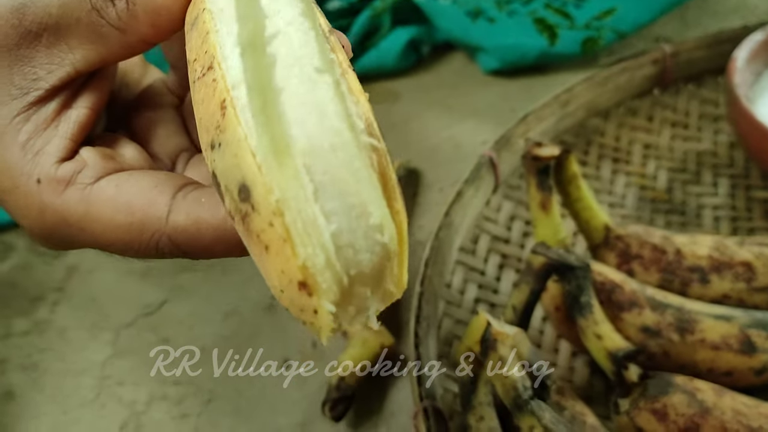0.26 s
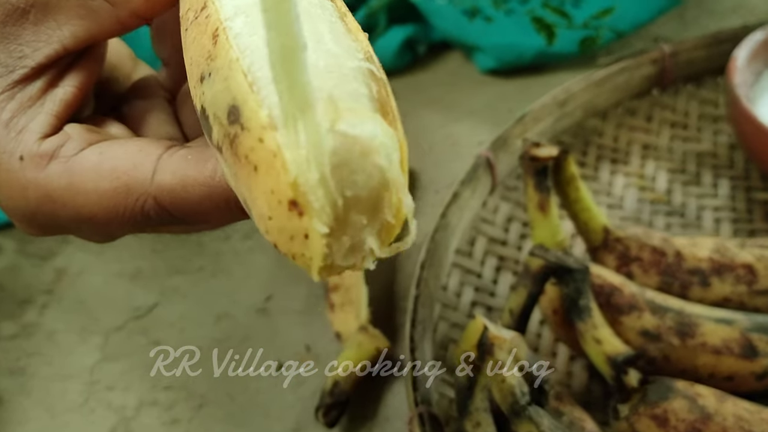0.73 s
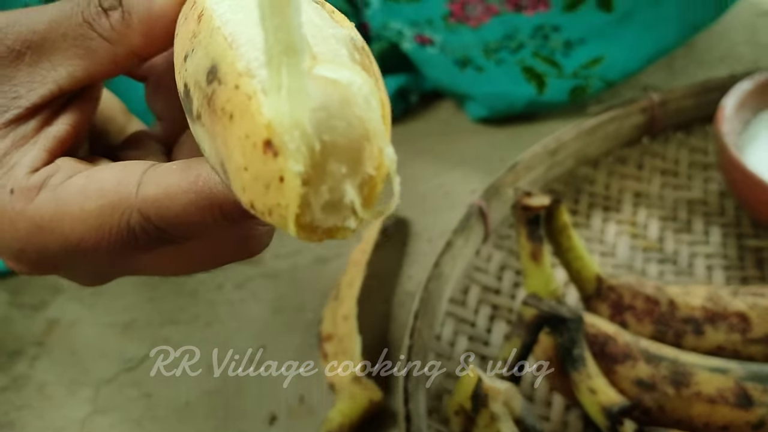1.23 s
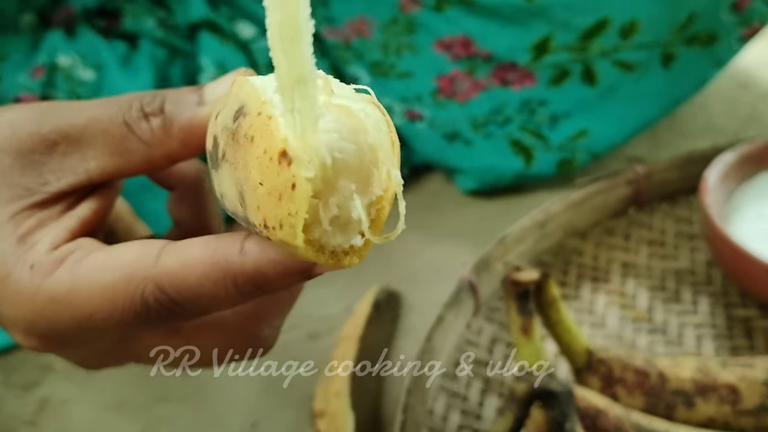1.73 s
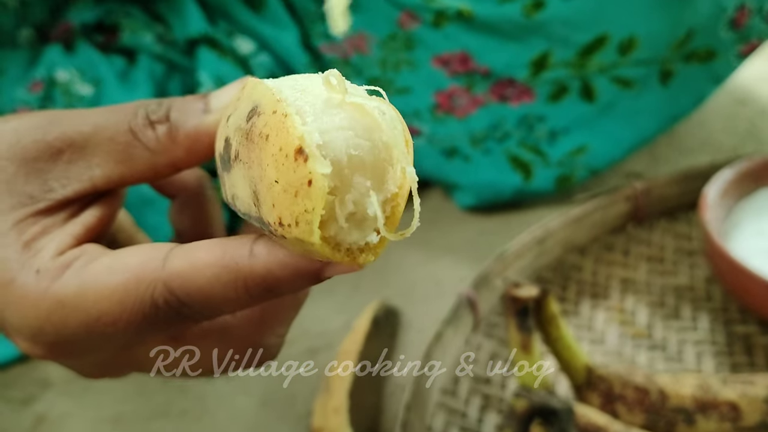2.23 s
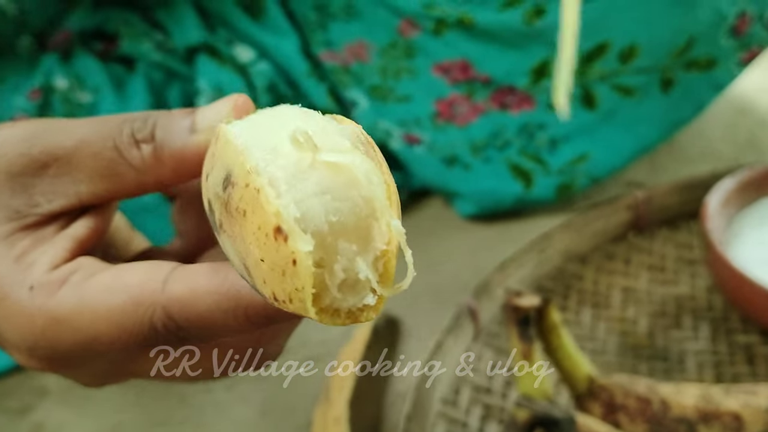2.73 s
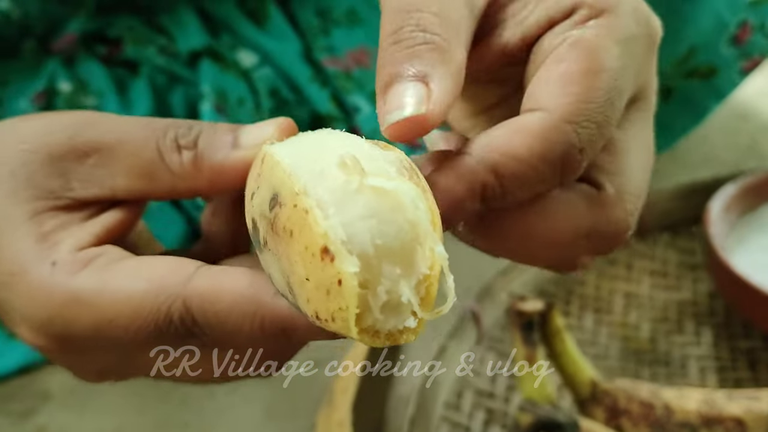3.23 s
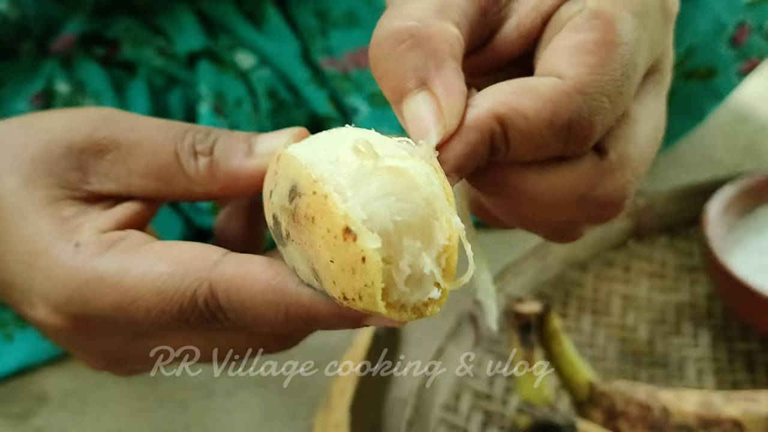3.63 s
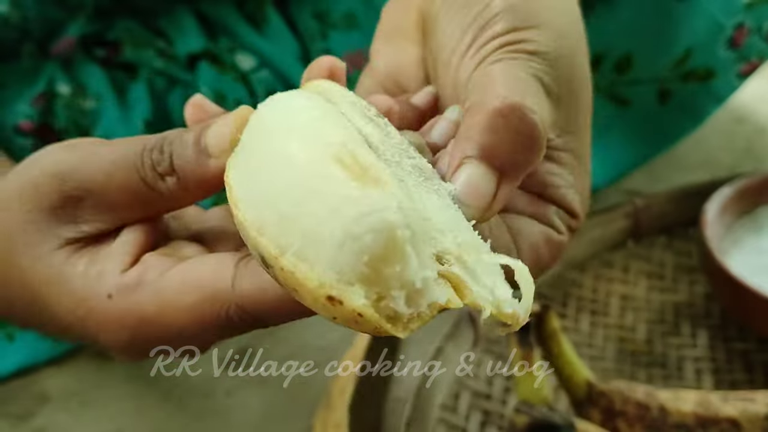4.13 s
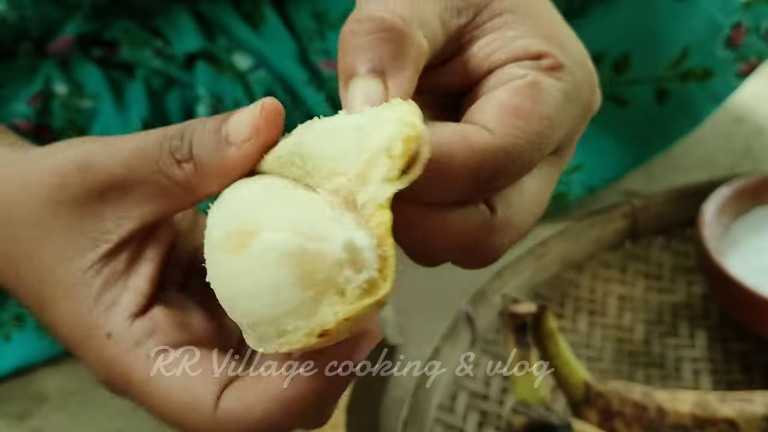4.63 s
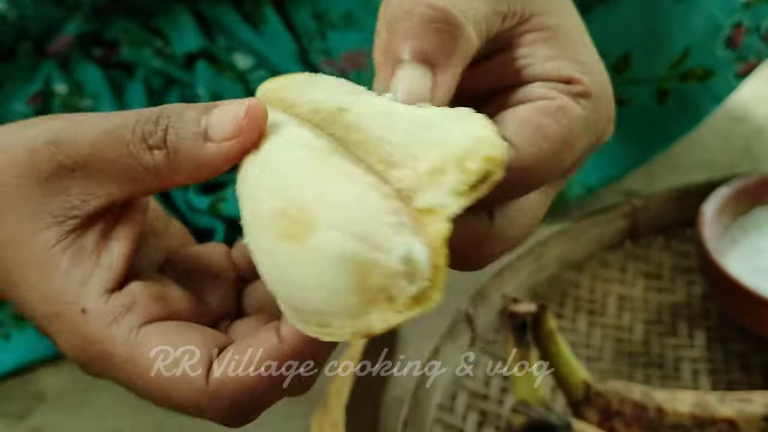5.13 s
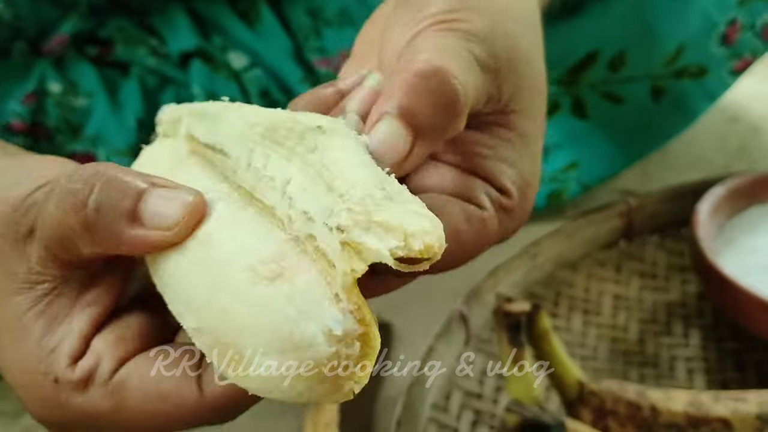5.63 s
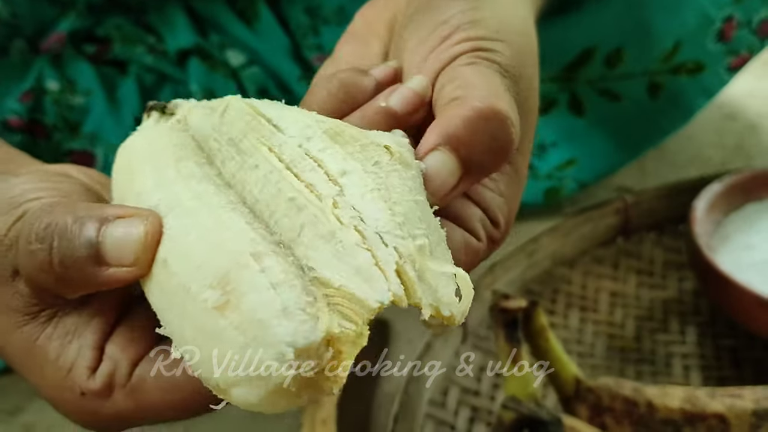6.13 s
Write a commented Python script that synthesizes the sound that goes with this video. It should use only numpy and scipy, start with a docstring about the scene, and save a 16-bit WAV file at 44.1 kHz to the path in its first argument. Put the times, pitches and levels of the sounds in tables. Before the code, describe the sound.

In a village yard, a distant engine thuds slowly under a wide, even hiss and low rumble. Small birds give short, falling chirps that echo off nearby walls. From halfway, the engine fades a little, farther birds add hoarse notes, including a two-note call given twice, and an insect buzzes faintly. Wind buffets both sides of the microphone, briefly ducking the background, and one soft rustle ends it.

```python
"""A village yard, where a far engine thuds under a wide, even hiss and a low rumble.
Small birds chirp, each a falling whistle thrown back by the walls; farther birds hold hoarse notes,
among them a two-note call given twice. In the second half moving air buffets the left and right
microphones, and the recorder turns the whole yard down at each strong puff.
A faint insect buzzes, and one soft rustle comes at the very end."""
import sys
import numpy as np
from scipy import signal
from scipy.fft import rfft, irfft
from scipy.io import wavfile
from scipy.ndimage import uniform_filter1d

SR = 44100
rng = np.random.default_rng(int(sys.argv[2]) if len(sys.argv) > 2 else 0)


def to_wav(sig):
    """Store sig (one row per channel, or 1-D mono) as 16-bit WAV at the path in sys.argv[1].

    Samples outside -1..1 are clipped; the rate is SR.
    """
    pcm = np.clip(np.atleast_2d(sig), -1, 1) * 32767
    pcm = np.round(pcm).astype(np.int16)
    wavfile.write(sys.argv[1], SR, pcm.T)  # frames by channels


N = 280902
TIME = np.arange(N) / SR


def air_puffs(rise=1.2, fall=3.32, steady_s=0.041, top_hz=410):
    """Swirls of air hit the microphones as soft, low bumps, mostly on one side."""
    # puffs of air: (peak time [s], length [s], louder side's level [dB], left minus right [dB], pitch [Hz])
    puffs = [(3.211, 0.12, -22.5, 6, 80), (3.311, .09, -21, -19, 55), (3.453, .09, -23.5, 4, 55),
             (3.84, 0.088, -18, 2, 44.7), (4.125, .08, -23.5, 20, 126), (4.259, .11, -13.5, -8.5, 53.7),
             (4.357, 0.14, -18.5, -18, 73.5), (4.498, 0.092, -24.5, -16, 162), (4.6, .11, -18.5, -8.5, 125),
             (4.689, .12, -15, 1, 55), (4.77, .13, -12.5, 16, 122), (4.901, .1, -12.5, -24, 104),
             (4.977, 0.081, -16, -13, 55), (5.124, .11, -17, -7.5, 79.6), (5.209, 0.09, -11.5, -15, 54),
             (5.348, 0.068, -11.5, -6, 48), (5.413, 0.076, -5.5, -22, 51), (5.536, 0.12, -6.5, -22, 39.7),
             (5.592, .12, -8.5, -30, 111), (5.732, 0.25, -22, -25, 258), (5.77, 0.18, -8, -21, 76.6),
             (5.967, .14, -18, -8.5, 126.5), (6.117, .1, -12.5, 6, 52), (6.203, 0.1247, -11, -13, 47.6),
             (6.291, 0.085, -10, -16, 47.3)]
    out, size = np.zeros((2, N)), SR // 2
    hz = np.fft.rfftfreq(size, 1 / SR)
    for s, length, db, lean_db, swirl_hz in puffs:
        ratio = hz / swirl_hz
        colour = ratio ** rise / np.sqrt(1 + ratio ** (2 * (rise + fall)))  # a hump near the pitch
        colour /= 1 + (hz / top_hz) ** 10
        swirls = irfft(rfft(rng.standard_normal((2, size))) * colour, size)
        swirls = steadied(unit_level(swirls), steady_s)
        swell = np.hanning(min(int(length * SR), size))
        bump = unit_level(swirls[:, :len(swell)] * swell)
        balance = sides(lean_db) / sides(lean_db).max()
        add(out, s - length / 2, gain_of(db) * balance * bump)
    return out


def breeze(steady_s=0.062):
    """Swirling air pushes on each microphone separately, as strongly as it moves there."""
    # strength of the breeze: (time [s], left level [dB], right level [dB])
    strength = [(3.1, -40, -35), (3.6, -31, -32.5), (4.1, -24.5, -19.5), (4.6, -26, -17),
                (5.7, -19.5, -13.5), (6.1, -24, -16.5), (6.37, -42, -18.5)]
    # tone of the buffeting: (frequency [Hz], relative level [dB])
    spectrum = [(8, -22.5), (18, 0.5), (35, 1.5), (70, 1), (110, -11.5), (170, -15), (260, -24), (400, -42),
                (800, -66)]
    s, *left_and_right = np.transpose(strength)
    level_db = np.array([np.interp(TIME, s, side, left=-90) for side in left_and_right])
    return steadied(noise(spectrum), steady_s) * gain_of(level_db)


def bird_chirps(hang=0.16, bend=0.8, waver=0.02, onset=0.08, focus=0.63, taper=0.63):
    """Small birds whistle a clear top note, then slide unsteadily down and fade."""
    # chirps: (time [s], length [s], first pitch [Hz], last pitch [Hz], level [dB],
    # left minus right [dB], wall echo [dB], centre of the swell [0-1])
    chirps = [(0.373, 0.054, 3400, 2610, -43, -10, 6, 0.4), (0.662, 0.05, 3710, 2640, -42, -11, 6, 0.35),
              (0.985, 0.085, 4940, 3035, -26.5, -8.5, 4.5, 0.46),
              (2.607, 0.099, 4670, 2945, -27, -7.5, 2.5, 0.29),
              (3.537, 0.098, 4265, 2856, -30.5, -9.5, 7, 0.3),
              (3.862, 0.04, 4020, 2740, -23, -6.5, 8, 0.17),
              (5.572, 0.041, 3150, 2100, -33.5, -3.5, 1, 0.56),
              (5.803, 0.088, 4390, 2850, -30, -5, 4.5, 0.6), (5.94, 0.046, 3585, 2920, -33, -7, -0.5, 0.3)]
    out = np.zeros((2, N))
    for s, length, first_hz, last_hz, db, lean_db, wall_db, centre in chirps:
        progress = np.linspace(0, 1, int(length * SR))
        drop = np.clip((progress - hang) / (1 - hang), 0, 1) ** bend
        wobble = 1 + waver * np.sqrt(drop) * wander(250)[:len(progress)]
        hz = first_hz * (last_hz / first_hz) ** drop * wobble
        swell = np.minimum(progress / onset, 1) * (1 - progress) ** taper
        swell /= (1 + ((progress - centre) / focus) ** 2) ** 2.4
        call = swell * np.sin(2 * np.pi * np.cumsum(hz) / SR)
        add(out, s, gain_of(db) * yard_echo(call, lean_db, wall_db))
    return out


def far_birds(quiver=0.035, quiver_hz=42, rasp=0.022):
    """Far birds hold one pitch; a quick quiver makes the note hoarse."""
    # held notes: (time [s], length [s], pitch [Hz], level [dB], left minus right [dB], roughness [0-1])
    notes = [(3.59, 0.16, 1195, -37, 0, 0.95), (3.736, 0.093, 1490, -42, 7, 0.85),
             (4.326, 0.16, 1189, -32.5, 1.5, 0.83), (4.448, 0.1, 1485, -41.5, -3.5, 0.8),
             (5.002, 0.1, 2940, -49.5, -9, .5), (5.233, 0.065, 2527, -40.5, -4, 0.34),
             (5.543, 0.046, 3185, -31.5, -10, 0.17), (5.986, 0.041, 2100, -42.5, -7, 0.57),
             (6.072, .065, 2720, -37, -8, 0.9)]
    out = np.zeros((2, N))
    for s, length, pitch_hz, db, lean_db, rough in notes:
        progress = np.linspace(0, 1, int(length * SR))
        shake = quiver * np.sin(2 * np.pi * quiver_hz * length * progress)
        shake += rasp * wander(68)[:len(progress)]
        hz = pitch_hz * (1 + rough * shake)
        swell = abs(np.sin(np.pi * progress ** 1.64)) ** 0.8
        call = swell * np.sin(2 * np.pi * np.cumsum(hz) / SR)
        add(out, s, gain_of(db) * yard_echo(call, lean_db, wall_db=3, tail_db=-5))
    return out


def yard_echo(call, lean_db, wall_db, tail_db=-4, first_s=0.005, last_s=0.052, fade_s=0.055):
    """A call arrives directly, then bounces off nearby walls, then blurs into a fading tail."""
    # how long the yard rings: (frequency [Hz], time to fade by 60 dB [s])
    ring_times = [(1000, 0.34), (3000, 0.66), (6000, 0.36)]
    size, bounces = SR // 2, 14
    t = np.arange(size) / SR
    hz, age_s, bands = signal.stft(rng.standard_normal((2, size)), SR, nperseg=256)
    bands *= gain_of(-60 * age_s / look_up(ring_times, hz)[:, None])
    tail = signal.istft(bands, SR, nperseg=256)[1][:, :size]
    paths = gain_of(tail_db) * unit_level(tail * (1 - np.exp(-t / 0.038))) / np.sqrt(size)
    for side, is_far in zip(paths, (lean_db < 0, lean_db > 0)):
        delays = abs(np.linspace(first_s, last_s, bounces) + rng.uniform(-0.0017, 0.0017, bounces))
        walls = unit_level(rng.choice([-1, 1], bounces) * np.exp(-delays / fade_s)) / np.sqrt(bounces)
        side[(delays * SR).astype(int)] += gain_of(wall_db) * walls
        side[13 * is_far] += 1  # the direct call reaches the far microphone 13 samples later
    heard = signal.fftconvolve(call[None], paths, axes=1)
    return sides(lean_db) * unit_level(heard) * np.sqrt(len(call) / heard.shape[1])


def insect(band_hz=(5480, 5950), length_s=0.064, lean_db=-5):
    """An insect gives short, high rasps, barely above the hiss."""
    # buzzes: (peak time [s], level [dB])
    buzzes = [(3.65, -44), (3.88, -41), (4.48, -45), (4.87, -46), (5.31, -38.5), (5.7, -40.5), (6.1, -48)]
    swell = sum(gain_of(db) * np.exp(-(2 * (TIME - s) / length_s) ** 4) for s, db in buzzes)
    return sides(lean_db) * band_noise(band_hz, order=3) * swell


def rustle(peak_s=6.37, length_s=0.091, level_db=-39, band_hz=(450, 1110)):
    """One soft, dull rustle."""
    swell = np.exp(-(2 * (TIME - peak_s) / length_s) ** 2)
    return gain_of(level_db) * swell * band_noise(band_hz, order=4)


def far_engine(level_db=-34, unsteady=0.35, jitter=0.0069, fade_from_s=2.86, fade_db_per_s=3):
    """Only the low tones of a slow engine carry this far, each wavering on the way; then it fades."""
    # engine speed: (time [s], firing rate [Hz])
    speed = [(0, 31), (1.2, 32.3), (2, 33.3), (3.2, 32.4), (6.4, 35.3)]
    # engine tones: (multiple of the firing rate, relative level [dB])
    tones = [(1, -1.5), (2, -1.5), (3, -7.5), (4, -10.5), (5, -13.5), (6, -6), (7, -17), (8, -25), (9, -22)]
    firing_hz = np.interp(TIME, *np.transpose(speed)) * (1 + jitter * wander(5.3))
    firings = np.cumsum(firing_hz) / SR
    thud = np.zeros(N)
    for multiple, db in tones:
        strength = gain_of(db) * (1 + unsteady * wander(2.6))
        thud += strength * np.cos(2 * np.pi * (multiple * firings + rng.random()))
    fade_db = fade_db_per_s * np.maximum(TIME - fade_from_s, 0)
    return gain_of(level_db - fade_db) * unit_level(thud)


def hiss_and_rumble(flicker_db=0.69, rumble_width=0.2):
    """A wide hiss, different on each side, over a rumble that both sides nearly share."""
    # tone of the hiss and of the far rumble, each: (frequency [Hz], relative level [dB])
    hiss_spectrum = [(100, 2.5), (350, -6), (900, -1.5), (1900, -6.5), (2700, -1), (3500, -1), (4500, -3),
                     (5200, -0.5), (5750, 2.5), (6400, -2.5), (7300, -5), (7900, -17)]
    rumble_spectrum = [(10, -14), (30, 2.5), (65, 0.5), (110, -10), (190, -8), (260, -15.5), (380, -24),
                       (500, -22), (750, -34), (1500, -49)]
    # how the hiss leans to one side: (frequency [Hz], left minus right [dB])
    hiss_lean = [(500, -3), (1500, -1), (2700, -5.5), (4600, -7.5), (7900, -6)]
    # background loudness: (time [s], hiss level [dB], rumble level [dB])
    levels = [(0, -35, -31.5), (1.4, -35, -32.5), (2.6, -36.3, -33), (4.0, -37, -33.5), (6.4, -37, -33)]
    s, hiss_db, rumble_db = np.transpose(levels)
    balance = sides(look_up(hiss_lean, np.fft.rfftfreq(N, 1 / SR)))
    hiss = irfft(rfft(noise(hiss_spectrum)) * balance, N)
    hiss *= gain_of(np.interp(TIME, s, hiss_db) + flicker_db * wander(12))
    rumble = noise(rumble_spectrum, channels=1) + rumble_width * noise(rumble_spectrum)
    return hiss + rumble * gain_of(np.interp(TIME, s, rumble_db))


def gain_of(db):
    """Turns decibels into a number to multiply by."""
    return 10 ** (np.asarray(db) / 20)


def unit_level(x):
    """Scales each channel to an average (rms) level of 1."""
    return x / np.sqrt(np.mean(x ** 2, axis=-1, keepdims=True) + 1e-20)


def look_up(table, hz):
    """Reads between a table's rows on a logarithmic frequency scale."""
    row_hz, value = np.transpose(table)
    return np.interp(np.log(hz + 1), np.log(row_hz + 1), value)


def sides(lean_db):
    """Left and right gains; a positive lean is louder on the left."""
    return gain_of(np.array([[0.5], [-0.5]]) * lean_db)


def add(mix, s, sound):
    """Lays a stereo sound into the mix at s seconds."""
    part = mix[:, max(round(s * SR), 0):][:, :sound.shape[1]]
    part += sound[:, :part.shape[1]]


def noise(spectrum, channels=2):
    """Separate noise for each channel, all with the same tone."""
    colour = gain_of(look_up(spectrum, np.fft.rfftfreq(N, 1 / SR)))
    return unit_level(irfft(rfft(rng.standard_normal((channels, N))) * colour, N))


def band_noise(band_hz, order):
    """Stereo noise between two frequencies; a higher order gives sharper edges."""
    band = signal.butter(order, band_hz, "bandpass", fs=SR, output="sos")
    return unit_level(signal.sosfilt(band, rng.standard_normal((2, N))))


def wander(rate_hz):
    """A smooth random drift, up to about the given rate."""
    hz = np.fft.rfftfreq(N, 1 / SR)
    return unit_level(irfft(rfft(rng.standard_normal(N)) / (1 + (hz / rate_hz) ** 4), N))


def steadied(swirls, steady_s):
    """Irons out the chance swells in a noise."""
    return swirls / np.sqrt(uniform_filter1d(swirls ** 2, int(steady_s * SR)) + 0.017)


def gain_control(dry, threshold_db=-22, ratio=1.77, sense_s=0.025, recover_s=0.34):
    """When either side gets loud, the recorder turns both down; the volume then creeps back."""
    power = uniform_filter1d(dry ** 2, int(sense_s * SR)).max(0)
    level_db = 10 * np.log10(abs(power) + 1e-12)
    cut_db = np.maximum(level_db - threshold_db, 0) * (1 - 1 / ratio)
    recovery = np.exp(-TIME / recover_s)
    held_db = np.maximum.accumulate(cut_db / recovery) * recovery
    return dry * gain_of(-uniform_filter1d(held_db, size=900))


def scene():
    """The yard with its birds and insect, air on the microphones and a last soft rustle."""
    yard = hiss_and_rumble() + far_engine() + bird_chirps() + far_birds() + insect()
    return yard + breeze() + air_puffs() + rustle()


def record(dry):
    """The recorder turns loud moments down, then cuts off the highest treble."""
    low_pass = signal.firwin(601, cutoff=7800, window=("kaiser", 9), fs=SR)
    return signal.oaconvolve(gain_control(dry), low_pass[None], "same")


dry = scene()
out = record(dry)
to_wav(out)
```